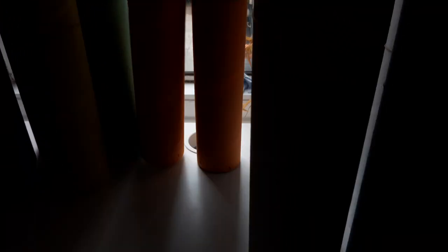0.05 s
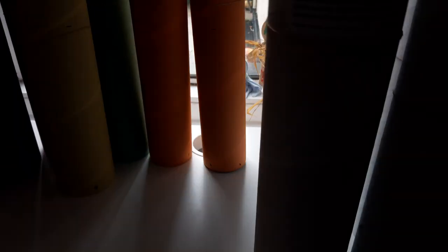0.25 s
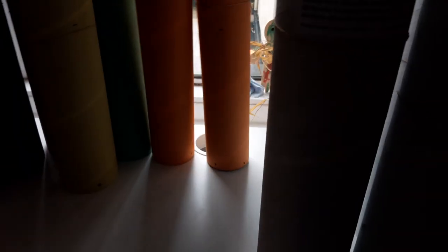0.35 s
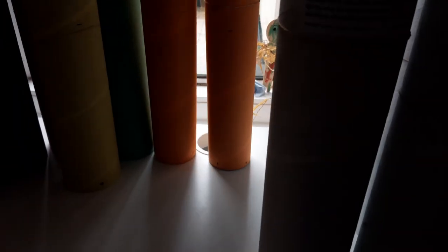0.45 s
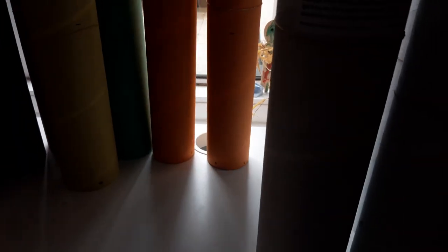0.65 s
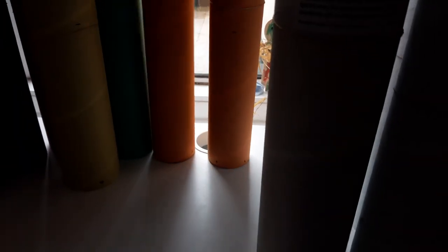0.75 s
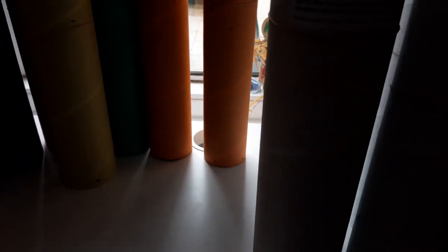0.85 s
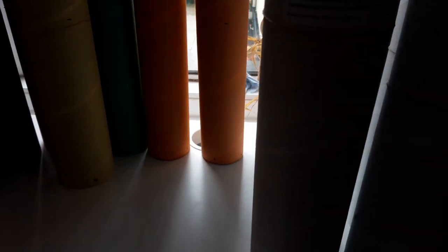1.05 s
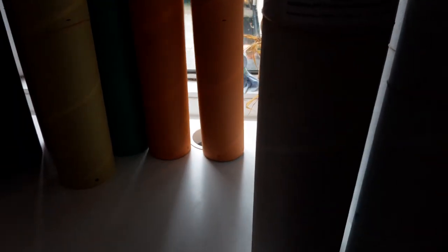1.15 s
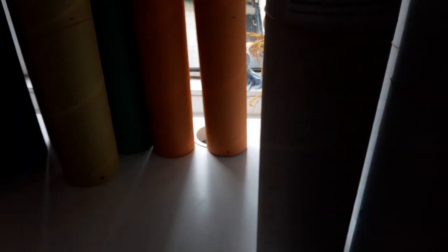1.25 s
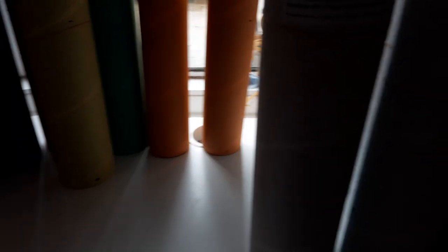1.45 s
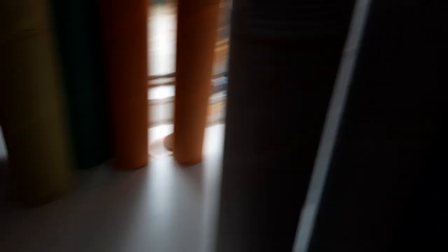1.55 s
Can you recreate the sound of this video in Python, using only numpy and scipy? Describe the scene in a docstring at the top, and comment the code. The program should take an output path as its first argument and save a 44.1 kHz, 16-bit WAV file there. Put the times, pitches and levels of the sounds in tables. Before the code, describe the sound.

Hollow cardboard tube knocks down hard on a windowsill, then softer taps and papery sliding

```python
"""Hollow cardboard knocks, bright snaps and soft papery sliding in a small room, close to one microphone:
tubes are stood on a hard sill and nudged about. Knocks and shuffling bumps ring the modes of tubes and sill;
snaps are noise bursts through a resonance; scrapes and slides are grainy noise under strokes.
Low noise rumbles below, all contacts reflect in the room, and a steady noise floor lies under them."""
import sys
import numpy as np
from scipy import signal
from scipy.fft import rfft, irfft
from scipy.io import wavfile

SR = 44100
rng = np.random.default_rng(int(sys.argv[2]) if len(sys.argv) > 2 else 0)


def field_ratio(decibels):
    """Amplitude ratio for a level in dB (20 dB per decade); scalars and array-likes work."""
    return 10 ** (np.asarray(decibels, dtype=float) / 20)


def unload_audio(sound):
    """Save the sound as a 16-bit wav file, at the path given as the first command line argument."""
    columns = np.transpose(np.atleast_2d(sound))
    # keep every value between -1 and 1, then stretch to whole-number steps
    steps = np.round(np.clip(columns, -1, 1) * 32767)
    wavfile.write(sys.argv[1], SR, steps.astype(np.int16))


N = 70560   # samples, 1.6 s

CONTACT_HZ_PER_HZ = 2.46   # corner frequency of a contact's push, per Hz of its favoured pitch


def butter(x, order, hz, kind="low"):
    """Butterworth filter, flat in its passband."""
    return signal.sosfilt(signal.butter(order, hz, kind, fs=SR, output="sos"), x)


def level_curve(points):
    """Gain over time through (t/s, level/dB) points, straight in dB between them."""
    s, db = np.transpose(points)
    return field_ratio(np.interp(np.arange(N) / SR, s, db))


def coloured(x, points):
    """Shape a signal's spectrum by (f/Hz, level/dB) points and bring it to rms 1."""
    hz, db = np.transpose(points)
    f = np.maximum(np.fft.rfftfreq(len(x), 1 / SR), 1)
    gain = field_ratio(np.interp(np.log(f), np.log(hz), db))
    y = irfft(rfft(x) * gain, len(x))
    return y / np.sqrt(np.mean(y ** 2) + 1e-20)


def random_hits(per_s):
    """Mask of random moments, on average per_s of them a second."""
    return rng.random(N) < per_s / SR


def ring(force, hz, t60):
    """One damped mode: a unit click starts a sine of height 1 that falls 60 dB in t60 seconds."""
    r, w = field_ratio(-60 / (t60 * SR)), 2 * np.pi * hz / SR
    # the tiny offset keeps the filter clear of denormal numbers
    return signal.lfilter([0, np.sin(w)], [1, -2 * r * np.cos(w), r * r], force + 1e-18)


def struck(force, centre_hz, octaves, share):
    """The body's modes, those near the favoured pitch strongest; slow pushes are not radiated."""
    # modes of tubes and sill: f/Hz, relative level/dB, full decay t60/s (share scales it)
    body_modes = [(76, -2.5, 0.055), (130, 0.5, 0.21), (149.5, -2, 0.11), (231, 3.5, 0.063),
                  (277, 3.5, 0.027), (300, 8, 0.081), (349.1, 4.5, 0.082), (434.7, -1.5, 0.05),
                  (505.6, 2.5, 0.089), (623, -3.5, 0.19), (717, -8, .06), (822, -4, 0.019),
                  (870, 1.5, 0.014), (1030, 3, 0.028), (1187, -1.5, 0.025), (1420, -5, 0.0501),
                  (1530, -15.5, 0.045)]
    radiates_above = 0.74   # share of the favoured pitch under which the body radiates poorly
    skirt = 1.8   # spreads away from the favoured pitch where the onset click is cut
    modes = 0
    for hz, db, t60 in body_modes:
        favour = np.exp(-.5 * (np.log2(hz / centre_hz) / octaves) ** 2)
        modes = modes + field_ratio(db) * favour * ring(force, hz, max(t60 * share, .005))
    low_hz = centre_hz * max(radiates_above, 2 ** (-skirt * octaves))
    modes = butter(modes, 2, centre_hz * 2 ** (skirt * octaves))
    return butter(modes, 3, low_hz, "high")


def rubbing(strokes, spectrum):
    """Dense grain, part smooth hiss and part fibre clicks, under rise-hold-fall strokes."""
    grains_per_s, grain_share = 7500, 0.92   # share of the power in fibre clicks
    t, stroke = np.arange(N) / SR, 0
    for s, rise, hold, fall, db in strokes:
        attack = np.sin(np.pi / 2 * np.clip((t - s) / rise, 0, 1)) ** 2
        fall_db = -60 * np.maximum(t - s - rise - hold, 0) / fall
        stroke = stroke + field_ratio(db + fall_db) * attack
    fibres = coloured(random_hits(grains_per_s) * rng.laplace(size=N), spectrum)
    hiss = coloured(rng.standard_normal(N), spectrum)
    return stroke * (np.sqrt(grain_share) * fibres + np.sqrt(1 - grain_share) * hiss)


def scrapes():
    """Rims dragged over the sill: broad grainy rubbing noise."""
    # drags: start t/s, rise/s, hold/s, fall t60/s, level/dB
    drags = [(-.01, 0.034, 0.04, 0.42, -49.5), (.125, 0.03, 0.11, 0.44, -54.5),
             (.24, 0.0085, 0.095, 0.033, -61)]
    # colour of rim on sill: f/Hz, relative level per Hz/dB
    rim_colour = [(300, -26), (700, -0.5), (1500, -1.5), (3000, -2), (5000, -0.5), (7500, -6), (11400, -9),
                  (11900, -17), (16000, -19.5)]
    return rubbing(drags, rim_colour)


def shuffle():
    """Soft bumps at random moments shake the body; separate sharp ones rattle modes around a higher pitch."""
    # shuffling pressure on the sill: t/s, level/dB
    pressure = [(0, -39), (0.097, -61), (0.149, -37), (.2, -44.5), (0.241, -26.5), (0.322, -48),
                (0.448, -83.5), (0.578, -101), (0.651, -70.5), (0.731, -92), (.78, -72.5), (.87, -54.5),
                (0.951, -58), (1.0, -60), (1.06, -60.5), (1.143, -83), (1.189, -50.5), (1.28, -52),
                (1.35, -84), (1.45, -79), (1.6, -88.5)]
    bumps_per_s, shuffle_hz, shuffle_octaves = 460, 185, 0.3
    # rims chattering during the shuffle
    rattle_hz, rattle_octaves, rattle_db, rattle_share = 520, 0.95, -12.5, 0.37
    bumps = random_hits(bumps_per_s) * rng.standard_normal(N)
    soft = butter(bumps, 2, CONTACT_HZ_PER_HZ * shuffle_hz)
    body = struck(soft, shuffle_hz, shuffle_octaves, share=0.7)
    sharp = random_hits(bumps_per_s) * rng.standard_normal(N)
    rattle = struck(sharp, rattle_hz, rattle_octaves, rattle_share)
    mix = body / body.std() + field_ratio(rattle_db) * rattle / rattle.std()
    return level_curve(pressure) * mix


def rumble():
    """Deep rumble: a narrow band of low noise under a level curve of its own."""
    # rumble level: t/s, level/dB
    rumble_curve = [(0.0, -24.5), (0.03, -81), (0.092, -71.5), (0.138, -64.5), (0.182, -65), (0.241, -61),
                    (0.395, -60), (0.422, -78), (0.49, -101.5), (0.556, -61.5), (0.658, -78.5),
                    (0.802, -80), (0.824, -75), (0.976, -61), (1.154, -98.5), (1.252, -65), (1.409, -83.5),
                    (1.6, -80.5)]
    noise = rng.standard_normal(N + SR)
    low = butter(noise, 3, [51, 100], "band")[SR:]   # the first second lets the filter settle
    return level_curve(rumble_curve) * low / low.std()


def quiet_floor():
    """The quiet of the room: steady noise, heaviest in the bass."""
    # floor colour: f/Hz, relative level per Hz/dB
    floor_colour = [(22, -43), (45, -7), (105, -9.5), (230, -13), (500, -17.5), (1200, -24), (2500, -27.5),
                    (6000, -33.5), (16000, -31)]
    floor_db = -74.5   # rms
    return field_ratio(floor_db) * coloured(rng.standard_normal(N), floor_colour)


def knocks():
    """Each rim contact is a short rounded push, shorter for higher favoured pitch; narrow ones swell in."""
    # rim contacts: t/s, relative level/dB, favoured pitch f/Hz, spread/octaves, share of the mode decay
    contacts = [(.0005, -34.5, 130, 0.23, 0.98), (0.166, -37, 130, 0.1, .6), (.1125, -37, 960, 1.3, 2.1),
                (0.1152, -26.5, 407, 1.08, 0.13), (.146, -25, 623, 0.085, 0.4),
                (0.204, -38, 357, 0.82, 0.8), (0.2153, -14, 410, 0.86, 0.21),
                (0.2183, -19.5, 352, 1.04, 0.17), (0.2204, -18.5, 1030, 0.47, 1.1),
                (.223, -10, 316, 0.7, 0.25), (0.218, -19, 130, 0.14, 0.8), (0.249, -32.5, 610, 0.58, 0.37),
                (0.261, -29.5, 386, 1.3, 0.43), (0.237, -22.5, 300, 0.29, .6),
                (0.272, -33, 504, 0.54, 0.93), (0.31, -40.5, 326, 0.32, 1.03), (0.548, -43, 76, 0.19, 0.58),
                (.599, -67.5, 353, 0.84, 0.99), (.606, -54, 130, .3, 0.9), (0.748, -58.5, 1028, 0.26, 0.25),
                (0.757, -58, 130, 0.52, 1.56), (0.8146, -62.5, 600, 1.34, 0.25),
                (.850, -28.5, 822, 0.059, 2.5), (0.853, -45, 600, 0.15, 0.56),
                (.874, -53.5, 900, 0.15, 2.2), (0.851, -52, 260, 0.19, 0.79),
                (0.9039, -47, 316, 0.66, 0.56), (.893, -58.5, 870, 0.28, 1.06),
                (0.908, -45.5, 870, 0.14, 1.5), (0.914, -35, 190, 0.31, 0.33),
                (0.963, -61, 1350, 0.34, 0.93), (0.988, -60, 300, 0.38, 0.28),
                (1.034, -53.5, 280, 0.25, 0.56), (1.057, -58.5, 332, 0.39, 0.35),
                (1.1706, -46.5, 450, 0.88, 0.85), (1.22, -52.5, 346, 1.1, 0.77),
                (1.182, -47, 586, 0.75, 0.26), (1.242, -38.5, 271, 0.31, 0.31),
                (1.245, -42, 600, 0.11, 0.46), (1.259, -53, 130, 0.18, 0.6),
                (1.2423, -37.5, 1420, 0.13, 1.35), (1.244, -44, 1030, 0.15, 0.83),
                (1.171, -42.5, 1420, 0.12, 0.64), (1.215, -45, 1310, 0.23, 1.2),
                (1.59, -65, 200, 0.88, 0.54)]
    swell_cycles = 0.26   # swell length in cycles of the favoured pitch, divided by the spread in octaves
    out, t = np.zeros(N + SR), np.arange(SR // 2) / SR
    for s, db, hz, octaves, share in contacts:
        push = t * np.exp(-2 * np.pi * CONTACT_HZ_PER_HZ * hz * t)
        swell = 1 - np.exp(-(t * hz * octaves / swell_cycles) ** 2)
        knock = swell * struck(push / push.sum(), hz, octaves, share)
        i = max(int(s * SR), 0)
        out[i:i + len(t)] -= field_ratio(db) * knock   # the push starts downwards
    return butter(out[:N], 3, 77, "high")


def room(x):
    """Dense reflections: octave bands of noise, each dying at its own rate."""
    # reverberation time: f/Hz, t60/s
    room_decay = [(100, 0.24), (500, 0.25), (2000, 0.22), (6000, 0.15), (14000, .12)]
    room_db, fade_in_s = -8, 0.006   # echo energy against the near sound; the reflections grow in
    t, (hz, t60) = np.arange(SR // 2) / SR, np.transpose(room_decay)
    white, echo = rng.standard_normal(SR // 2), 0
    for low in 40 * 2 ** np.arange(9.):
        band = butter(white, 2, [low, min(2 * low, .45 * SR)], "band")
        band_t60 = np.interp(np.log(1.4 * low), np.log(hz), t60)
        echo = echo + band * field_ratio(-60 * t / band_t60)
    echo = echo * np.clip(t / fade_in_s, 0, 1) ** 2
    return field_ratio(room_db) * signal.fftconvolve(x, echo / np.sqrt(np.sum(echo ** 2)))[:N]


def snaps():
    """Paper edges snap: noise that starts at once and dies fast, through a broad resonance of the edge."""
    # snaps: t/s, relative level/dB, centre f/Hz, bandwidth as share of the centre, t60/s
    edge_snaps = [(.112, -24, 3530, 0.94, .06), (.115, -31, 5492, 2.1, .08),
                  (0.2143, -26.5, 2493, 0.76, .04), (0.2157, -44.5, 5014, 1.4, 0.033),
                  (.220, -31.5, 4986, 0.75, .04), (0.2249, -33, 6500, 1.8, 0.056),
                  (0.8133, -46.5, 8000, 0.53, 0.0294), (.821, -65.5, 7920, 0.16, 0.038),
                  (.848, -52, 8000, 0.99, 0.034), (.851, -53, 4500, 0.92, .06),
                  (.914, -59, 9840, 0.42, 0.026), (0.9213, -54.5, 7900, 0.86, 0.057),
                  (.940, -62.5, 5100, 0.36, 0.03), (.997, -55, 8440, .8, 0.025),
                  (1.1696, -37.5, 4080, 0.31, 0.0088), (1.1697, -39, 5480, 0.19, 0.0174),
                  (1.171, -52, 2596, 0.26, 0.066), (1.2177, -45.5, 5000, 0.68, 0.035),
                  (1.2405, -44, 3500, 1.1, 0.039), (1.245, -46, 4570, 0.54, 0.019)]
    click_db, broad_db = 8, -15   # first instant over the noise; unfiltered burst beside the resonance
    out, t = np.zeros(N + SR), np.arange(SR // 5) / SR
    for s, db, hz, width, t60 in edge_snaps:
        burst = rng.standard_normal(len(t)) * field_ratio(-60 * t / t60) + field_ratio(click_db) * (t == 0)
        edge = signal.iirpeak(hz, 1 / width, fs=SR)
        band = signal.lfilter(*edge, signal.lfilter(*edge, burst))
        band = band * np.sqrt(SR / (np.pi * hz * width))   # offsets the loss in narrow bands
        i = int(s * SR)
        out[i:i + len(t)] += field_ratio(db) * (band + field_ratio(broad_db) * burst)
    return butter(out[:N], 2, [600, 15200], "band")


def slides():
    """Fingers slide over the paper: bright grainy rubbing noise."""
    # finger strokes: start t/s, rise/s, hold/s, fall t60/s, level/dB
    finger_strokes = [(.48, .05, 0.0345, 0.11, -65), (.73, 0.0063, 0.044, 0.28, -69),
                      (.845, 0.0084, 0.0106, 0.154, -62), (.955, 0.0074, 0.041, 0.3, -71.5),
                      (1.0, 0.027, 0.054, 0.3, -58.5), (1.158, 0.0185, 0.021, 0.12, -55.5),
                      (1.217, 0.016, 0.022, 0.13, -55.5), (1.355, .04, 0.062, 0.12, -65)]
    # colour of finger on paper: f/Hz, relative level per Hz/dB
    paper_colour = [(1500, -27.5), (2600, -12), (3200, -7), (4500, -2), (6000, -1), (8000, -6.5),
                    (9800, -2), (11400, -13), (11900, -18), (16000, -16)]
    return rubbing(finger_strokes, paper_colour)


def scene():
    """All contacts and their reflections, with the rumble and the quiet of the room."""
    near = scrapes() + shuffle() + knocks() + snaps() + slides()
    mix = near + room(near) + rumble() + quiet_floor()
    return mix[None]   # one channel


def top_cut(x):
    """Nothing passes above the cut-off."""
    return signal.sosfilt(signal.butter(12, 15850, fs=SR, output="sos"), x)


def record(dry):
    """One microphone close to the sill: a steep treble limit and a dip in the response near the sill."""
    top_hz, dip_hz, dip_width_hz, dip_share = 15900, 2020, 310, 0.33
    limited = signal.sosfilt(signal.cheby2(12, 50, top_hz, fs=SR, output="sos"), dry)
    dip = signal.lfilter(*signal.iirpeak(dip_hz, dip_hz / dip_width_hz, fs=SR), limited)
    return top_cut(limited - dip_share * dip)


dry = scene()
out = record(dry)
unload_audio(out)
```